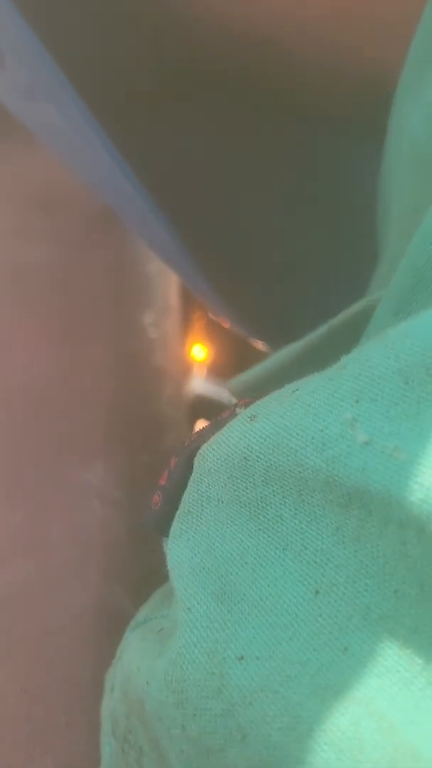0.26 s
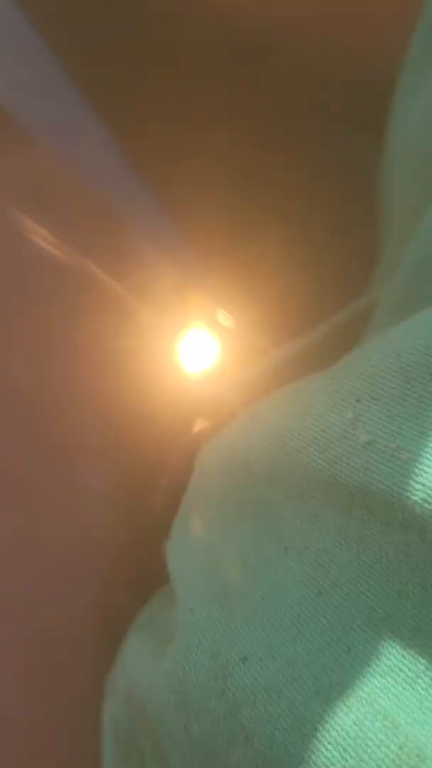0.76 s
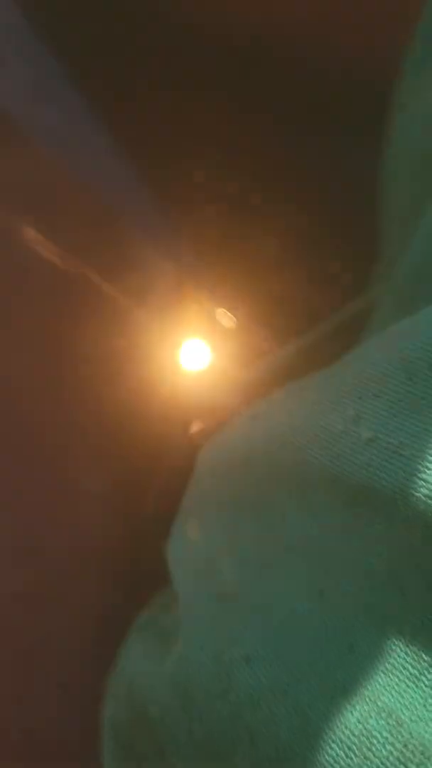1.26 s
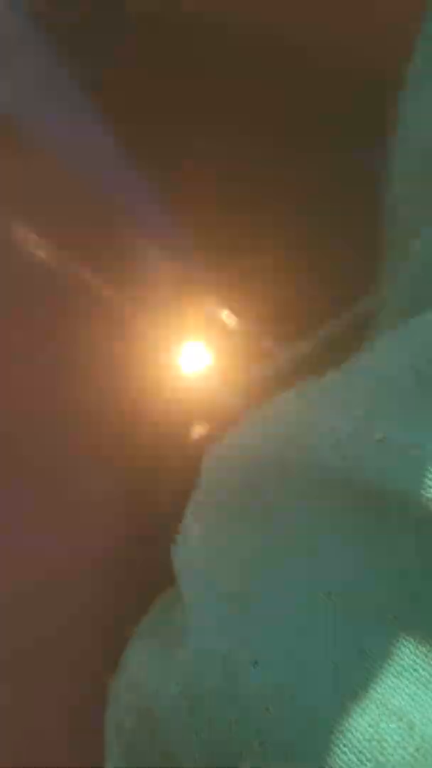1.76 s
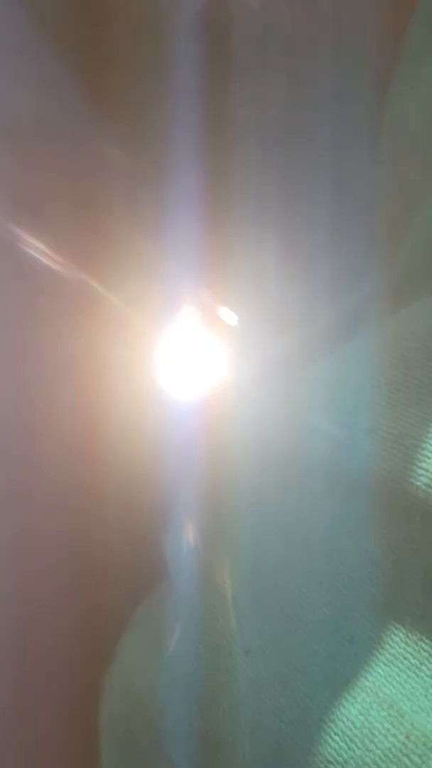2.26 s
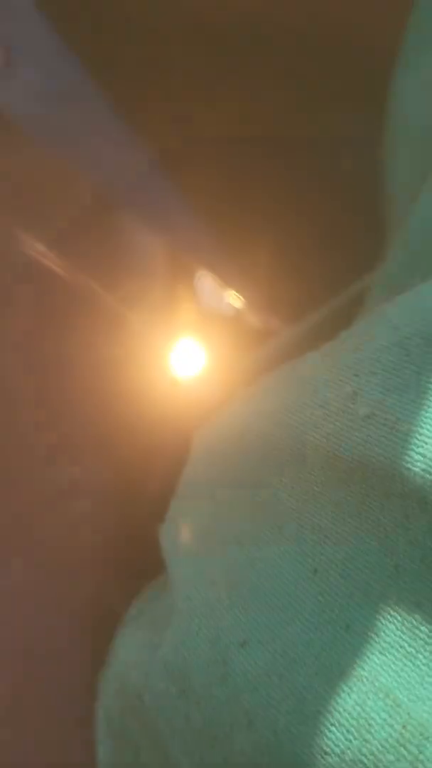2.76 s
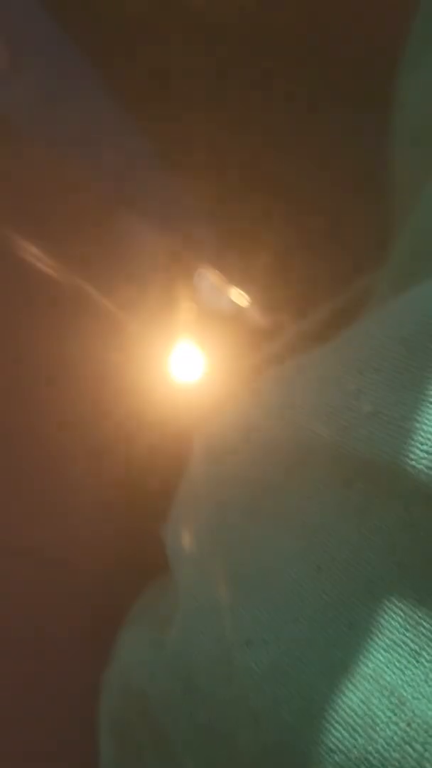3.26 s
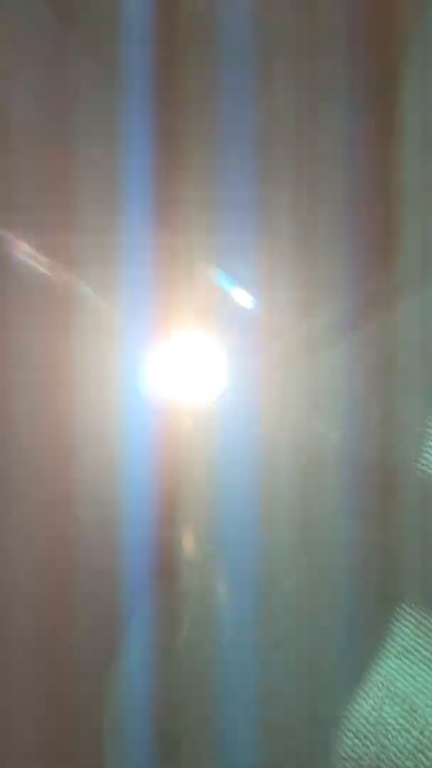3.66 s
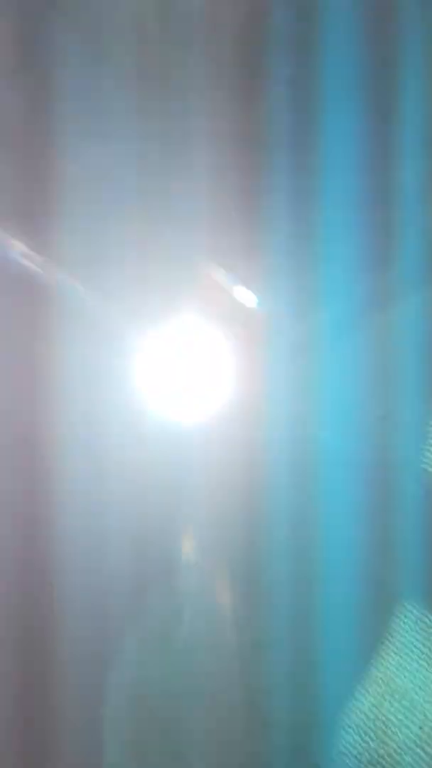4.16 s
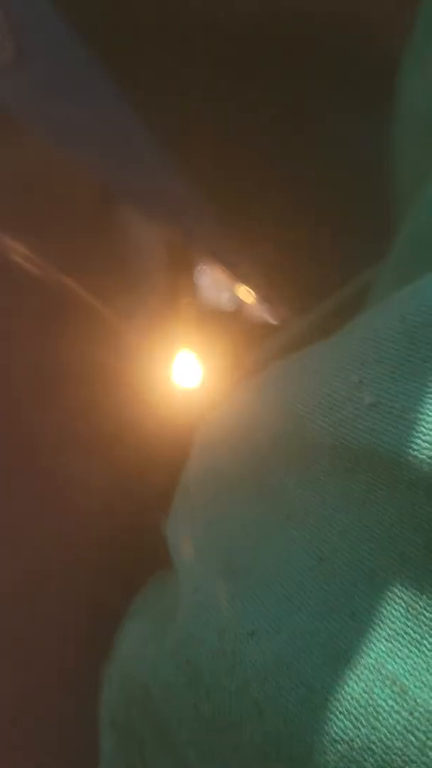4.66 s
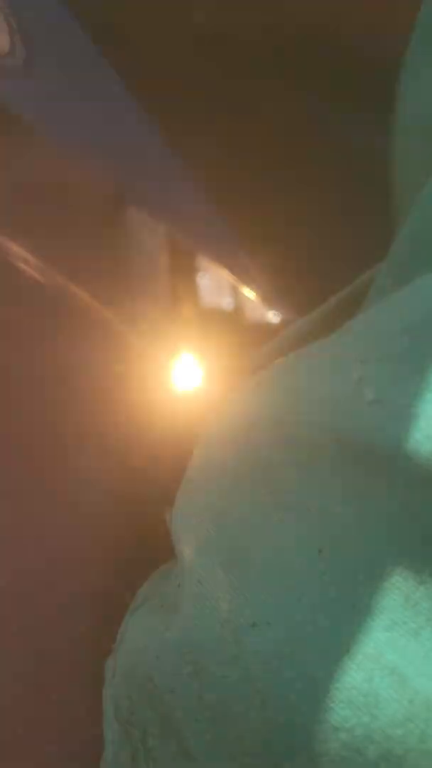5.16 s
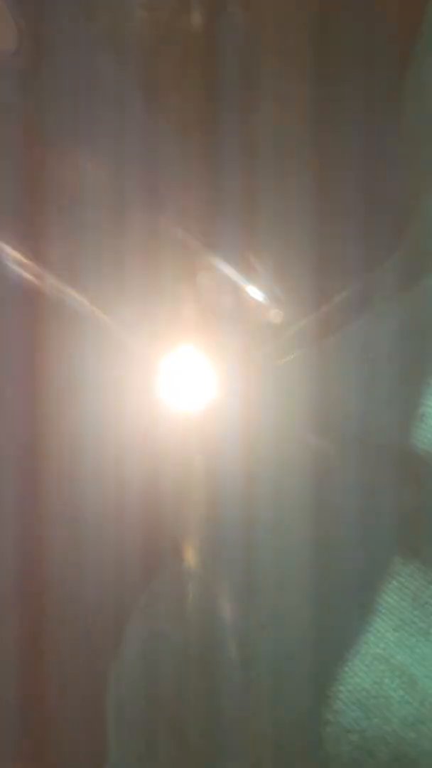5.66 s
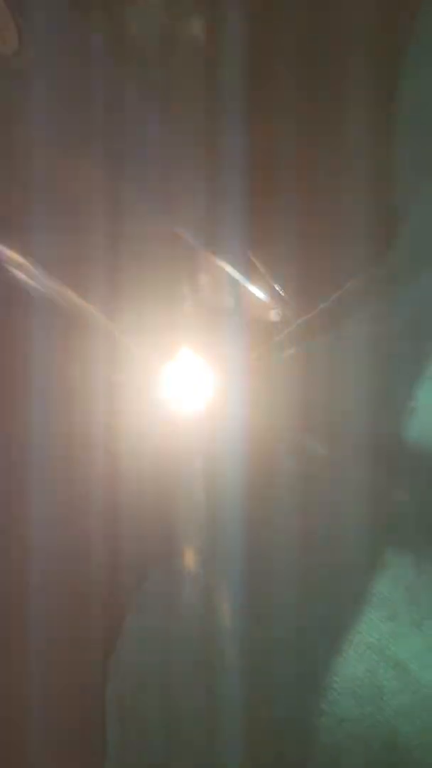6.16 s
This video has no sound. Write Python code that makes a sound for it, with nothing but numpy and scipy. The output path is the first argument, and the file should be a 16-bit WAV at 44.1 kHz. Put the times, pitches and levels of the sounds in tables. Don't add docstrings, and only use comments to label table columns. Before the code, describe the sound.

Harsh electric arc bursts spit dense sparks and low pops over a steady air hiss, with spent air thumping the nearby microphone.

```python
import sys
import numpy as np
from scipy import signal
from scipy.fft import rfft, irfft, next_fast_len
from scipy.io import wavfile
from scipy.ndimage import uniform_filter1d, map_coordinates

SR = 44100
rng = np.random.default_rng(int(sys.argv[2]) if len(sys.argv) > 2 else 0)


def master(y):
    cut = np.clip(np.atleast_2d(y).T, -1, 1)
    pcm = np.round(cut * 32767)
    wavfile.write(sys.argv[1], SR, pcm.astype(np.int16))


def level_to_linear(level):
    exponent = np.asarray(level, float) / 20
    return 10 ** exponent


N = 283112
SIZE = next_fast_len(N + SR)
HZ = np.maximum(np.arange(SIZE // 2 + 1) * SR / SIZE, 1)

# frequency in Hz, left level in dB, right level in dB.
JET_COLOUR = [(162.5, 4.5, 6), (432, -8.5, -3), (620, -9, -4), (995, -9.5, -9), (1315, -6, -14.5),
              (1770, -1, -7), (2250, -4.5, -5), (3430, -4, -4), (3950, -8.5, -14.5), (5400, -12, -19),
              (7660, -13.5, -24), (11000, -4, -11), (12100, -5, -5), (15900, 1, 2.5)]


def over_hz(table):
    hz, *columns = np.transpose(table)
    return np.array([np.interp(np.log(HZ), np.log(hz), column) for column in columns])


def over_time(table):
    s, *columns = np.transpose(table)
    return np.array([np.interp(np.arange(N) / SR, s, column) for column in columns])


def band(lo_hz, hi_hz):
    return np.sqrt(1 / (1 + (lo_hz / HZ) ** 12) / (1 + (HZ / hi_hz) ** 12))


def smooth(x, s):
    k = max(int(s * SR), 1)
    return uniform_filter1d(uniform_filter1d(x, k), k)


def walk(rate):
    k = int(SR / rate)
    held = np.repeat(rng.standard_normal(N // k + 1), k)[:N]
    wander = smooth(held, 1 / rate)
    return wander / wander.std()


def ports(pair, colour, alike, lo_hz, hi_hz):
    # frequency in Hz, width in Hz, left dB, right dB.
    modes = [(532, 37, 10.5, 8), (673.5, 51, 5.5, 5), (792, 182, 8.5, 9.5), (1090, 180, 6.5, 1.5),
             (1800, 66, -14.5, -1), (2505, 57, 4, 3), (2746, 80, -2.5, 5), (3084, 130, -2.5, -7),
             (3390, 330, 6, 2), (3540, 180, -0.5, 0), (3655, 300, -13.5, 0.5), (4400, 190, -8, 2),
             (4890, 59, -31, 10.5), (5630, 220, -1.5, 1.5), (5230, 140, -1.5, 5), (5900, 210, -2.5, 2),
             (6660, 250, -4, 7), (7600, 250, 3.3, 9), (8680, 410, -6, -21)]
    # frequency in Hz, lead of the left in radians, likeness from 0 to 1.
    port_pair = [(150, .01, .85), (400, .8, .6), (500, 2.3, .85), (900, 2.8, .85), (1100, 3.3, .45),
                 (1500, 5.3, .78), (2250, 7.7, .85), (3000, 8.6, .8), (4500, 10.2, .65), (5100, 3.5, .5),
                 (8000, 16.3, .45), (10000, 19.3, .4), (13500, 31.6, .5), (16000, 33.5, .45)]
    db = over_hz(colour) - 24 * np.log2(np.maximum(colour[0][0] / HZ, 1))
    for hz, width, *peak_db in modes:
        db = db + np.outer(peak_db, 1 / (1 + (2 * (HZ - hz) / width) ** 2))
    cepstrum = irfft(np.log(level_to_linear(db.mean(axis=0))), SIZE)
    cepstrum[SIZE // 2:] = 0
    phase = rfft(2 * cepstrum).imag
    lead, like = over_hz(port_pair)
    like = np.clip(alike * like, 0, 1)
    inside = (HZ > lo_hz) & (HZ < hi_hz)
    norm = np.sqrt(np.mean(level_to_linear(db) ** 2 * inside))
    right = (like * pair[0] + np.sqrt(1 - like ** 2) * pair[1]) * np.exp(-1j * lead)
    mixed = np.array([pair[0], right])
    return irfft(mixed * level_to_linear(db) * np.exp(1j * phase) / norm, SIZE)[:, :N]


def corner_tail():
    # middle of the band in Hz, time to fade by 60 dB in seconds, level in dB.
    tail = [
        (300, 0.11, -15),
        (754, 0.34, -10.5),
        (1470, 0.12, -15),
        (7800, 0.14, -7.5),
    ]
    s = np.arange(SR // 2) / SR
    response = 1
    edges = [1] + [np.sqrt(a[0] * b[0]) for a, b in zip(tail, tail[1:])] + [SR]
    for (_, t60, db), lo, hi in zip(tail, edges, edges[1:]):
        echo = rng.standard_normal((2, len(s))) * level_to_linear(-60 * s / t60) * (s > .003)
        response = response + level_to_linear(db) * band(lo, hi) * rfft(echo, SIZE) / np.sqrt(np.sum(echo ** 2) / 2)
    return response


def gusts():
    # peak time in seconds, length in seconds, peak level in dB, left minus right in dB.
    puffs = [(0, .08, -30.5, -9), (0.097, .08, -29, 8), (.25, 0.34, -26, -3), (0.5, .12, -24, -1),
             (0.706, 0.1, -34, 12), (0.933, 0.34, -26, -1.5), (1.222, .14, -27, 0),
             (1.4, 0.35, -27.5, -8.5), (1.825, .12, -30, -4), (2.33, 0.11, -30.5, -11.5),
             (2.673, 0.17, -26.5, 2), (3.05, 0.19, -28.5, -3), (3.193, .1, -34, -9), (3.39, .1, -29.5, -12),
             (3.606, 0.07, -32.5, 6), (3.93, 0.26, -26.5, 0), (4.127, 0.17, -33, 5), (4.39, 0.14, -31, -4),
             (4.695, 0.16, -31, -1), (4.876, 0.16, -28, 14), (5.067, 0.19, -27, -2), (5.316, 0.25, -26, 3),
             (5.584, 0.15, -29, -9), (5.7, .09, -31, 8), (5.82, 0.079, -32, -7), (6.05, 0.18, -33, 2),
             (6.41, .1, -34, -12)]
    lull_db = -33.5
    t = np.arange(N) / SR
    power = level_to_linear(lull_db) ** 2
    for s, length, db, pan_db in puffs:
        peak = level_to_linear(db + np.c_[[pan_db, -pan_db]] / 2) ** 2
        power = power + peak * np.exp(-8 * ((t - s) / length) ** 2)
    return 10 * np.log10(power)


def wind():
    # start in seconds, peak level in dB, left minus right in dB.
    slaps = [(0.069, -21, 6.0), (0.419, -16, 6.5), (0.441, -18, 13), (0.489, -21, 2), (1.237, -22, 1.5),
             (1.299, -19, -2), (1.358, -23, -5), (1.409, -29, -10.0), (2.3, -20, -16), (3.919, -28, -5.0),
             (4.768, -16, 13), (4.799, -21, 0), (4.858, -18, -4), (4.889, -30, 8), (4.908, -27, 5.0),
             (4.999, -24, -1.5)]
    slap_hz = 110
    level_db = gusts()
    lumps = rng.standard_normal((2, 2, N)) * level_to_linear([2.0 * walk(35) for _ in range(2)])
    thump_shape = band(45.6, 108) + 0.14 * band(15, 42)
    flutter_shape = band(142, SR) / (1 + (HZ / 180) ** 2)
    thump = irfft(rfft(lumps[0], SIZE) * thump_shape, SIZE)[:, :N]
    flutter = irfft(rfft(lumps[1], SIZE) * flutter_shape, SIZE)[:, :N]
    flutter_db = 1.9 * (level_db + 29.0) - 37.5
    out = thump / thump.std() * level_to_linear(level_db) + flutter / flutter.std() * level_to_linear(flutter_db)
    turns = np.arange(SR // 30) / SR * slap_hz
    suck = -np.sin(2 * np.pi * turns) * np.exp(-turns / 0.52)
    for s, db, pan_db in slaps:
        start = int(s * SR)
        out[:, start:start + len(suck)] += suck * level_to_linear(db + 5.5 + np.c_[[pan_db, -pan_db]] / 2)
    return out


def plate_roar(loud_db, gust):
    extra_loud_db = loud_db + 18.5
    roar_db = -27 + 1.42 * extra_loud_db
    air, site_air = rng.standard_normal((2, 2, N))
    roar = band(1090, 9220) * rfft(air * level_to_linear(roar_db + 0.47 * gust + 0.41 * walk(40)), SIZE)
    bright = band(4540, 5400) * rfft(air * level_to_linear(roar_db - 10.5 + extra_loud_db), SIZE)
    drone = band(0, 1200) * rfft(site_air * level_to_linear(0.31 * roar_db - 20.5 + 1.5 * walk(19)), SIZE)
    return ports(roar + bright + drone, JET_COLOUR, 0.66, 1020, 4900)


def nozzle_hiss(loud_db, tilt_db, gust):
    # frequency in Hz, width in Hz, left dB, right dB, dB gained per dB of left over right.
    ridges = [
        (12050, 570, -9, -5, 1),
        (12930, 820, -16.5, -7, 0.5),
        (13320, 390, -17, -19, 3.5),
        (14400, 460, -20, -12, 1),
        (15350, 730, -15, -22, 2.1),
    ]
    hiss_db = np.array([loud_db + tilt_db / 2, loud_db - tilt_db / 2])
    air = rng.standard_normal((2, N))
    hiss = ports(band(7100, SR) * rfft(air, SIZE), JET_COLOUR, 0.99, 11000, 15500)
    hiss = hiss / hiss.std(axis=1, keepdims=True)
    for hz, width, *db, lean in ridges:
        ridge = irfft(rfft(hiss, SIZE) / (1 + (2 * (HZ - hz) / width) ** 2), SIZE)[:, :N]
        ridge_db = np.c_[db] + 15.5 + lean * (tilt_db - 6.5) + 0.62 * walk(4.1)
        hiss = hiss + ridge * level_to_linear(ridge_db)
    hiss = hiss / np.sqrt(uniform_filter1d(hiss ** 2, SR // 4))
    return hiss * level_to_linear(hiss_db + .5 * gust + .5 * walk(8.1))


def jet():
    # time in seconds, hiss level in dB, left over right in dB as the phone turns.
    loudness = [(0, -13, 3), (.2, -13.5, 3), (.4, -12.5, 3.5), (.54, -12.5, 3), (.66, -17, 0), (.85, -21.5, 6),
                (1.05, -19.5, 5), (1.3, -19, 5), (1.7, -19.5, 5.5), (2.4, -19.5, 4.5), (3, -18.5, 5.5),
                (3.6, -19, 7), (4.2, -18, 8), (4.6, -19, 8), (4.85, -17, 7.5), (5.2, -17.5, 7.5),
                (5.8, -19.5, 10), (6.42, -18.5, 10)]
    loud_db, tilt_db = over_time(loudness)
    gust = walk(9.9)
    return plate_roar(loud_db, gust), nozzle_hiss(loud_db, tilt_db, gust)


def sparks():
    rate, spread_db, flicker_db = 5000, 4.0, 1.0
    chance, side, size = rng.random((3, 2, N))
    size_db = np.minimum(-spread_db * np.log(size + 1e-9), 14)
    clicks = (chance < rate / SR) * np.sign(side - .62) * level_to_linear(size_db)
    return clicks / clicks.std() * level_to_linear(flicker_db * walk(130))


def arc_pops():
    # time in seconds, peak level in dB.
    collapses = [(0.717, -6), (0.789, -13), (0.9, -27), (0.96, -6), (1.167, -18), (1.479, -0.5),
                 (1.687, -4.5), (2.017, -17), (2.438, -23), (2.716, -5.5), (2.969, -14), (3.265, -16),
                 (3.478, -8.5), (3.548, -8), (3.787, -30), (3.972, -17), (4.248, -19), (4.577, -25),
                 (5.109, -18), (5.36, -13), (5.588, -22), (5.798, -15), (5.91, -12), (5.978, -16)]
    pop_s, pop_db = 0.002, 25
    pops = np.zeros(N)
    for s, db in collapses:
        pops[int((s + .003) * SR)] = -level_to_linear(db + pop_db)
    return rfft(pops, SIZE) / (1 + 1j * HZ * pop_s) ** 2


def arc():
    # start in seconds, end in seconds, crackle at the strike in dB, crackle at the break in dB.
    burns = [(0.542, 0.666, -18, -9.5), (0.691, 0.741, -14.5, -16), (0.754, 0.787, -9.5, -13),
             (0.853, 0.898, -15.5, -10), (0.95, 0.974, -16, -13), (1.067, 1.176, -13, -12),
             (1.457, 1.484, -10.5, -10.5), (1.654, 1.694, -9.5, -10), (1.886, 2, -13, -12),
             (2.008, 2.023, -25, -9), (2.297, 2.44, -17, -10.5), (2.692, 2.725, -16.5, -9.5),
             (2.883, 2.975, -10.5, -11), (3.033, 3.19, -18.5, -22), (3.17, 3.277, -18.5, -14),
             (3.439, 3.482, -16.5, -10), (3.54, 3.565, -11.5, -11.5), (3.666, 3.792, -12, -13),
             (3.947, 3.98, -17.5, -10.5), (4.209, 4.255, -13, -14.5), (4.387, 4.46, -16.5, -11),
             (4.454, 4.485, -19, -24), (4.489, 4.58, -14, -12.5), (5.018, 5.117, -14.5, -11.5),
             (5.249, 5.359, -15, -13), (5.439, 5.593, -14, -15), (5.64, 5.807, -14.5, -14.5),
             (5.842, 5.915, -13.5, -15.5), (5.935, 5.981, -17.5, -13.5), (5.991, 6.422, -16, -14)]
    # frequency in Hz, left level in dB, right level in dB.
    arc_colour = [(153, -9.5, -5), (243, -3, 1), (361, -3, 6.5), (606, -9, -5), (966, -5, -0.5),
                  (1190, -7.5, -10.5), (1602, 2, 0.5), (2440, -2, -0.1), (3500, -1.5, -2.5),
                  (4190, -5, -9.5), (5020, -12.5, -18), (9400, -17.5, -33.5), (12540, -17, -8.5),
                  (13600, -10, -11)]
    # low edge in Hz, high edge in Hz, lag in seconds, rise and fall in seconds.
    layers = [
        (0, 400, 0.00079, 0.0039),
        (528, 790, 0.00092, 0.0043),
        (4500, 66000, -0.003, 0.0081),
        (2900, 4120, -0.00086, 0.0045),
        (965, 2670, -0.0018, 0.0062),
    ]
    # dB at the usual crackle, dB per dB of crackle,
    # dB gained while a burst settles, dB per second as the groove deepens.
    follows = [
        (-14.5, 0.8, -2, 0.59),
        (-15, 1.27, 2, 0.4),
        (-9.5, 0.73, -2.5, -0.08),
        (-13.5, 0.43, -2.5, -0.62),
        (-14.5, 1.5, 0, 0),
    ]
    usual_crackle_db, settle_s = -14, 0.051
    clicks = sparks()
    pair = 0
    for (lo, hi, lag, rise), (usual_db, follow, settle_db, deepen_db) in zip(layers, follows):
        gate = np.zeros(N)
        for start, end, strike_db, break_db in burns:
            span = np.arange(int((start + lag) * SR), min(int((end + lag) * SR), N))
            age = (span - span[0]) / SR
            crackle_db = strike_db + (break_db - strike_db) * age / (end - start)
            level_db = usual_db + follow * (crackle_db - usual_crackle_db)
            level_db = level_db + settle_db * np.tanh(age / settle_s) + deepen_db * (start - 1.5)
            gate[span] = level_to_linear(level_db)
        body = smooth(gate, rise)
        strike = np.maximum(body - np.roll(smooth(gate, 0.031), int(0.0019 * SR)), 0)
        burst = clicks * (body + .4 * strike) * level_to_linear(0.47 * walk(60))
        pair = pair + band(lo, hi) * rfft(burst, SIZE)
    pair = pair + arc_pops()
    return ports(pair * corner_tail(), arc_colour, 1.123, 880, 5600)


def scene():
    # time in seconds, delay of the right port in milliseconds.
    turn = [(0, -0.018), (.5, -0.005), (2.1, -0.009), (2.4, 0.0073), (4.8, 0.013), (5.1, 0.0058),
            (6.42, -0.0038)]
    roar, hiss = jet()
    left, right = arc() + roar
    delay_ms = over_time(turn)[0] + .012 * walk(4)
    right = map_coordinates(right, [np.arange(N) - delay_ms * SR / 1000], order=5)
    return np.array([left, right]) + hiss + wind()


def low_pass(x):
    return signal.sosfilt(signal.butter(12, 15900, fs=SR, output="sos"), x)


def record(dry):
    held = smooth(np.abs(dry).max(axis=0), 0.029)
    gain = np.minimum(1, (level_to_linear(-11) / held) ** 0.23)
    rounded = np.tanh(dry * gain * 1.02) / 1.02
    top_cut = signal.ellip(10, .2, 70, 15680, fs=SR, output="sos")
    return low_pass(signal.sosfilt(top_cut, rounded))


dry = scene()
out = record(dry)
master(out)
```